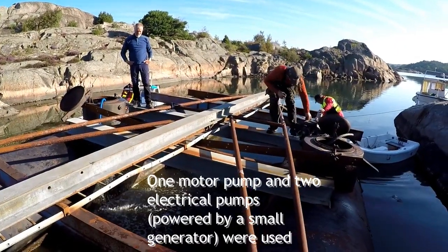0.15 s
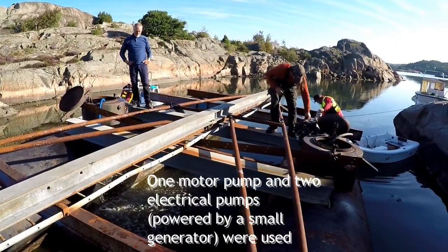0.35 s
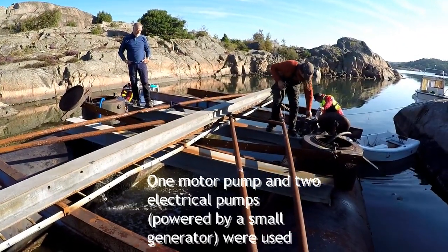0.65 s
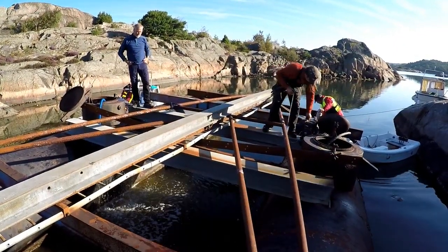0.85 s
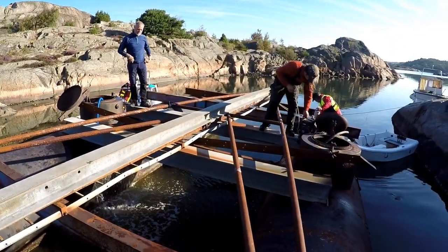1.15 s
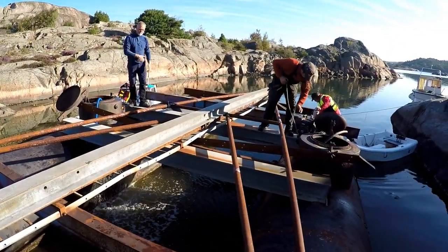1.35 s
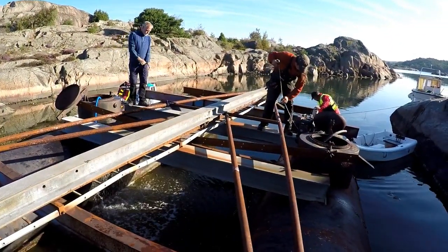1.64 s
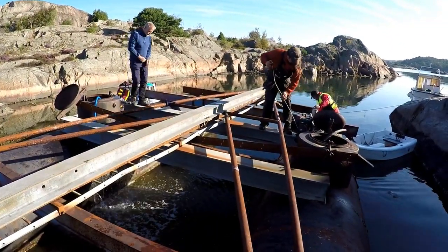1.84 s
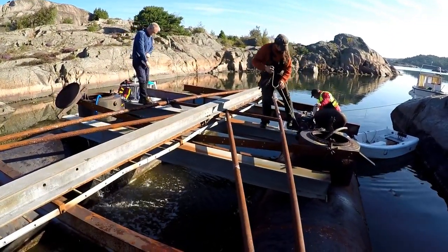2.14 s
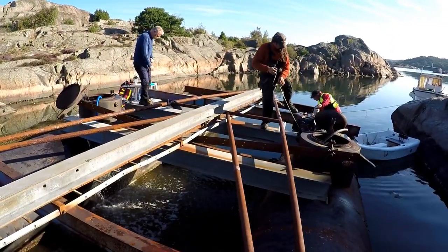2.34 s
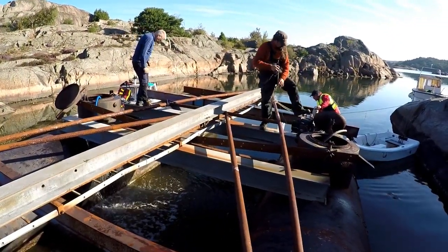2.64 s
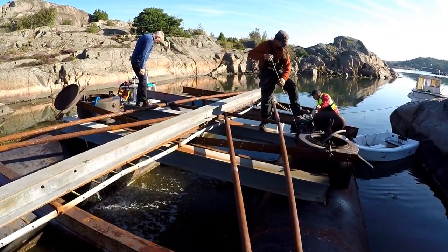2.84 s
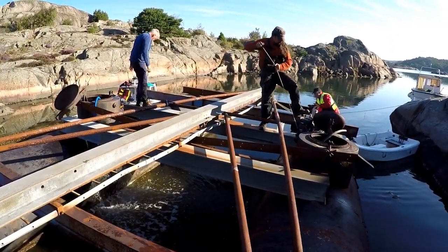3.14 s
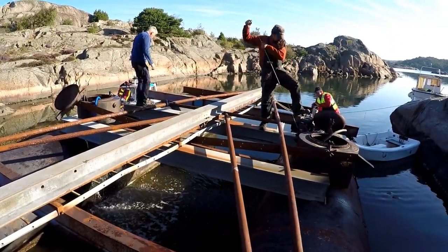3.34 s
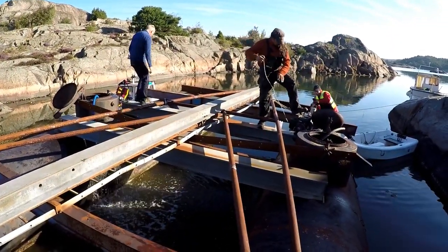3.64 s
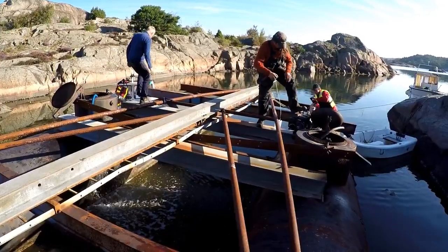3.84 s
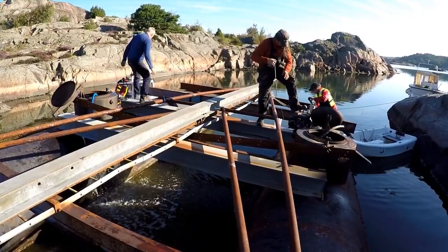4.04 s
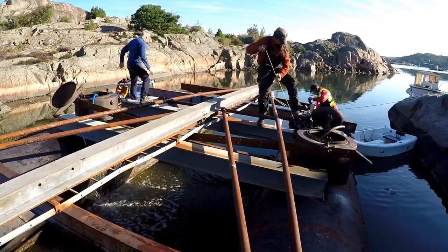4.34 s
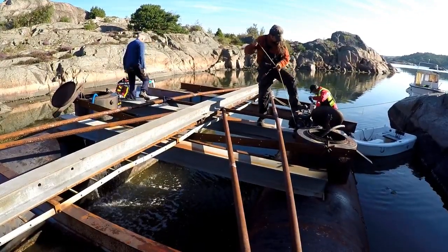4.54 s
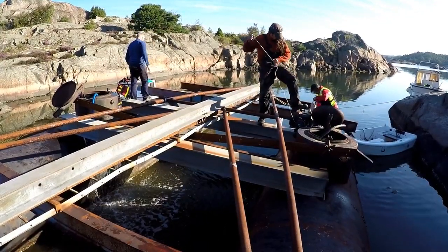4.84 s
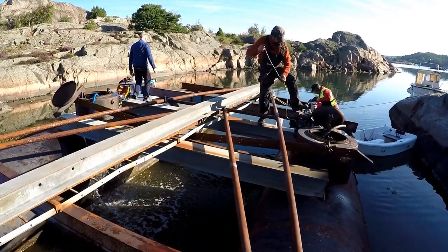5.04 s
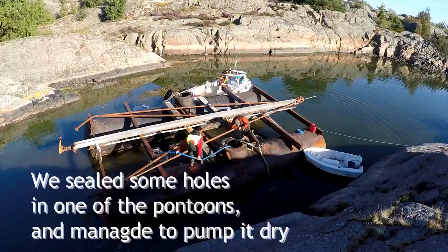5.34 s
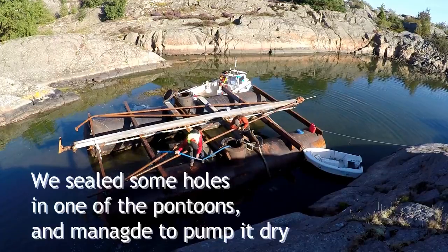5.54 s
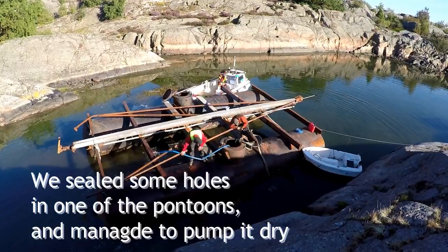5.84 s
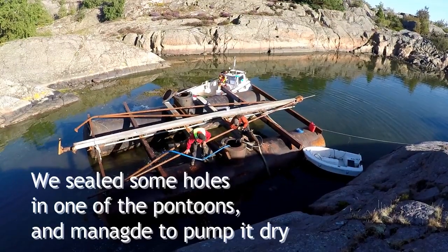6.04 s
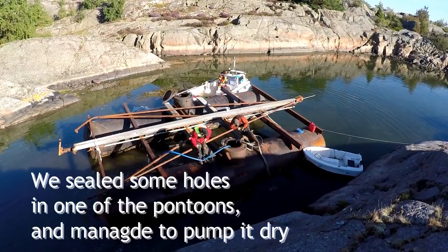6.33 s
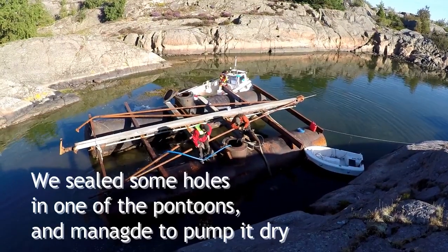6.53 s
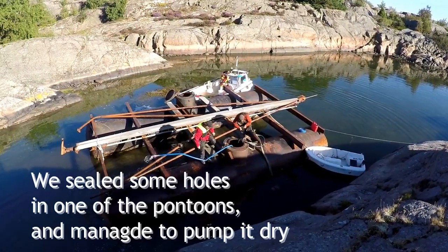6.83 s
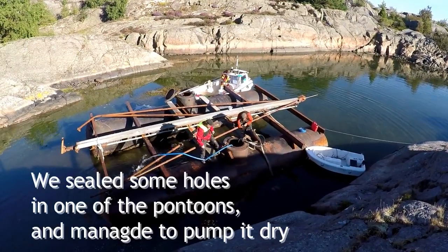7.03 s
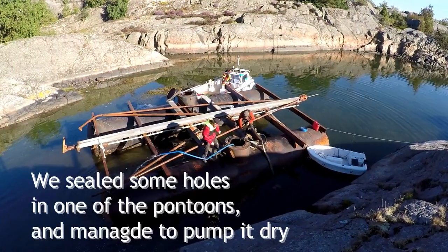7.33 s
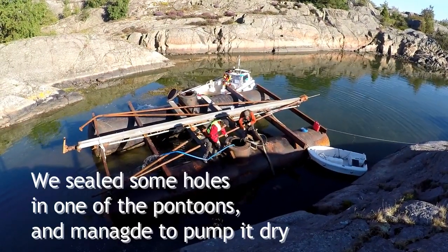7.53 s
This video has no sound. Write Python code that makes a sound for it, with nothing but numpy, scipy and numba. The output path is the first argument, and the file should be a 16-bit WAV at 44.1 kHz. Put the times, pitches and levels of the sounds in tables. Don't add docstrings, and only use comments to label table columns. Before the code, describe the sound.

From 0 to 5.27 s, a pumped water jet gushes near the microphone in an open rocky cove: steady bright hiss that flickers and swells slightly, crowded with bubbles, sharp plops and little splashes several times a second. Beneath it lies a faint, steady low engine drone around 70 Hz, gentle wind rumble and thin electronic hiss. At 5.27 s everything drops silent for about 0.04 s, returning with a small click. The water is now fainter and duller, briefly swelling near 5.75 s, while strong low gusts buffet the microphone. Shoes scuff and tick on gritty stone from 5.55 to 6.6 s, with a soft heel thud at 6.03. A short dry housing knock lands at 6.45, a longer, hollower one at 7.03. From 7.18 s something hollow scrapes; another heel thuds at 7.45. A metal ring clinks brightly, loudest at 7.42, then bounces at 7.56, 7.60 and 7.65 as it ends.

```python
import sys
import numpy as np
from scipy import signal
from scipy.fft import rfft, irfft, next_fast_len
from scipy.io import wavfile
from scipy.ndimage import uniform_filter1d
from numba import njit

SR = 44100
rng = np.random.default_rng(int(sys.argv[2]) if len(sys.argv) > 2 else 0)


def invert_db(x):
    u = np.asarray(x, float) / 20
    return 10 ** u


def master_out(mix):
    frames = np.transpose(np.atleast_2d(mix))
    ceiling = np.clip(frames, -1, 1)
    pcm = np.round(ceiling * 32767).astype(np.int16)
    wavfile.write(sys.argv[1], SR, pcm)


N = 338681
T = np.arange(N) / SR
CUT_S = (5.2705, 5.3138)
BY_WATER = T < CUT_S[1]


def unit(x):
    return x / np.sqrt(np.mean(x ** 2))


def colour(x, spectrum, bumps, lo_hz, hi_hz):
    size = next_fast_len(N)
    f = np.arange(size // 2 + 1) * SR / size + 1e-3
    hz, db = np.transpose(spectrum)
    db = np.interp(np.log(f), np.log(hz), db)
    db = db + sum(boost / (1 + (2 * (f - centre) / width) ** 2) for centre, width, boost in bumps)
    shaped = rfft(x, size) * invert_db(db)
    in_band = irfft(shaped * (f > lo_hz) * (f < hi_hz), size)[:N]
    return irfft(shaped, size)[:N] / np.std(in_band)


def walk(rate):
    k = int(SR / rate)
    held = np.repeat(rng.standard_normal(N // k + 1), k)
    return unit(uniform_filter1d(uniform_filter1d(held, k), k)[:N])


@njit
def grains(start, hz, cycles, size, glide):
    out = np.zeros(N)
    for k in range(len(start)):
        tau, phase = cycles[k] / hz[k] * SR, 0.
        for i in range(min(int(6 * tau), N - start[k])):
            phase += 2 * np.pi * hz[k] * (1 + glide * i / tau) / SR
            out[start[k] + i] += size[k] * np.sin(phase) * np.exp(-i / tau)
    return out


def typed(events, cycles, glide, db):
    s, peak_db, hz = np.array(events, float).T[:3]
    return grains((s * SR).astype(np.int64), hz, np.full(len(s), cycles), invert_db(peak_db + db), glide)


def crack(s, db, fade_s, lo_hz, hi_hz):
    snap = signal.lfilter(*signal.butter(1, [lo_hz, hi_hz], "band", fs=SR), rng.standard_normal(N))
    return invert_db(db) * snap * (T > s) * np.exp(-np.maximum(T - s, 0) / fade_s)


def strike(s, db, modes, damp_s, push_s):
    t = np.maximum(T - s, 0)
    ring = sum(invert_db(g - 60 * t / t60) * np.sin(2 * np.pi * hz * t) for hz, g, t60 in modes)
    push = np.sin(np.pi / 2 * np.minimum(t / push_s, 1)) ** 2
    choke = np.exp(-np.maximum(t - damp_s, 0) / 0.0018)
    return invert_db(db) * ring * push * choke


def spray(count, scatter_db, flicker_db, bubble_db):
    burst = invert_db(flicker_db * (0.31 * walk(19) + 0.56 * walk(35) + 0.5 * walk(90)))
    when, pitch, size, ring = rng.random((count, 4)).T
    start = (when * N).astype(np.int64)
    hz = 400 * 30. ** pitch
    size_db = np.minimum(-scatter_db * np.log(1 - size), 6)
    level = hz * invert_db(size_db) * np.minimum(burst[start], 1.15)
    bubbles = grains(start, hz, 2 + 6 * ring ** 2, level, 0.028)
    return unit(rng.standard_normal(N) * burst) + invert_db(bubble_db) * unit(bubbles)


# start in seconds, peak in dB, pitch in Hz, surge in dB.
PLOPS = [(0.018, -39, 1950, -72), (0.1226, -47, 5320, -61), (0.37, -50, 3460, -80), (0.536, -33, 5490, -69),
         (0.85, -37, 5360, -78), (0.9367, -36, 4100, -68), (1.4215, -43, 5120, -59),
         (1.484, -40, 4040, -68), (1.5497, -40, 2240, -64), (1.7814, -43, 2230, -60),
         (2.066, -39, 3850, -67), (2.118, -35, 4300, -82), (2.3, -40, 5420, -57), (2.4397, -34, 5200, -69),
         (2.535, -39, 3990, -72), (2.593, -33, 5860, -63), (2.8993, -32, 5400, -64),
         (2.9617, -39, 2270, -67), (3.164, -36.5, 3930, -70), (3.398, -35, 3540, -55),
         (3.5363, -34, 3560, -65), (3.626, -34, 3160, -59), (3.8324, -39, 4020, -61),
         (3.9235, -33, 5260, -76), (4.09, -39, 4020, -61), (4.5994, -40, 3470, -61),
         (4.838, -36, 3980, -53), (5.023, -41, 4020, -61), (5.1537, -39, 2290, -72),
         (5.2071, -40, 3610, -64)]
# start in seconds, peak in dB, pitch in Hz, surge in dB.
MORE_PLOPS = [(0.2289, -41, 3460, -64), (1.8194, -49, 3500, -64), (2.4384, -40, 5260, -66),
              (2.6694, -46, 2330, -65), (2.7332, -41, 2260, -74), (2.9392, -42, 3940, -70),
              (3.016, -50, 3890, -72), (3.1343, -39, 4070, -70), (3.4644, -42, 2250, -75),
              (3.5922, -41, 5360, -64), (3.7459, -42, 5200, -66), (3.8696, -47, 2890, -68),
              (4.2592, -40, 5370, -71), (4.6798, -41, 5500, -66), (4.7316, -42, 4270, -64),
              (4.811, -38, 5330, -61), (4.8494, -41, 3940, -64), (4.9172, -40, 2950, -80),
              (5.2294, -40, 5450, -64)]


def slaps(rise_s, fade_s):
    def bump(s, up, down):
        return np.exp(-np.abs(T - s) / np.where(T < s, up, down))

    out = 0
    for s, peak_db, _, surge_db in PLOPS + MORE_PLOPS:
        sheet = invert_db(peak_db - 33) * bump(s, rise_s, fade_s)
        out = out + sheet + invert_db(surge_db) * bump(s, 0.0021, 0.0073)
    return out


# time of the top in seconds, peak in dB.
MISTS = [(0.0598, -50.5), (0.1246, -53), (0.2194, -53.5), (0.4658, -51.5), (0.6943, -50), (0.7552, -49.5),
         (0.8515, -50.5), (0.9547, -49), (1.1538, -52.5), (1.2645, -50), (1.3957, -56), (1.479, -52),
         (1.5529, -49.5), (1.6696, -52.5), (1.7749, -47.5), (1.9061, -52), (2.1091, -52.5), (2.1705, -53),
         (2.2722, -56), (2.4379, -52), (2.5925, -49.5), (2.6648, -52), (2.7496, -48.5), (2.8544, -49.5),
         (2.9527, -50.5), (3.014, -52), (3.1772, -50.5), (3.2555, -52), (3.4516, -55.5), (3.5354, -50),
         (3.6237, -51.5), (3.699, -51.5), (3.7858, -48.5), (3.8487, -47.5), (3.9255, -48), (4.124, -47.5),
         (4.2842, -50), (4.3595, -49.5), (4.4867, -50.5), (4.6014, -51.5), (4.6683, -51), (4.7711, -49),
         (4.8374, -51.5), (5.1267, -54.5), (5.228, -51.5)]


def patchy(x, split_hz, body_db, mist_db, rate):
    body = signal.sosfiltfilt(signal.butter(2, split_hz, fs=SR, output="sos"), x)
    usual_db = np.mean(np.array(MISTS)[:, 1])
    cloud_db = 0
    for s, db in MISTS:
        spread_s = np.where(T < s, 0.0085, 0.019)
        cloud_db = cloud_db + max(2 + db - usual_db, 0) * np.exp(-((T - s) / spread_s) ** 2)
    before_cut = T < CUT_S[0]
    cloud_db = cloud_db - np.mean(cloud_db[before_cut]) * before_cut
    body_gain = invert_db(body_db * walk(rate) + 0.27 * cloud_db)
    mist_gain = invert_db(mist_db * walk(rate) + cloud_db)
    return body * body_gain + (x - body) * mist_gain


# frequency in Hz, density in dB per Hz.
WATER_NEAR = [(150, -35), (250, -2), (426, -10.5), (1260, -10), (1450, -4), (1750, -5), (2980, -2),
              (3310, -5.5), (5350, -3), (5940, -10), (15300, -24)]
WATER_FAR = [(150, -45), (250, -7), (682, -2.5), (1200, -6), (1330, -10), (1410, -5), (2410, -3.5),
             (3080, -6), (4770, -7), (12000, -33), (15600, -57), (22000, -120)]
# centre in Hz, width in Hz, boost in dB.
HOUSING_NEAR = [(776, 410, 4.5), (1240, 117, 6), (1456, 161, -17), (1736, 280, 3), (2220, 77, 4.5),
                (2080, 140, -5), (3060, 270, 2), (3337, 155, -9.5), (3490, 210, 7), (3980, 115, 6.5),
                (4900, 270, -3), (5360, 270, 5), (6390, 300, 3.5), (7160, 360, 7.5), (11770, 1500, 6.5)]
HOUSING_FAR = [(2460, 115, 7.8), (2800, 88, 1.1), (3400, 230, 4.5), (5020, 450, 4.5)]
# time in seconds, level in dB.
JET_FLOW = [(0, -54.5), (1.0, -54.5), (1.62, -55), (1.76, -54), (2.5, -54), (3.1, -55), (3.4, -52.5),
            (3.75, -55.5), (4.5, -54.5), (5.26, -54), (5.32, -61.5), (5.636, -62), (5.762, -56.5),
            (6.16, -62), (6.404, -59.5), (7.15, -62)]
# start in seconds, peak in dB, pitch in Hz.
GLUGS = [(1.1, -46, 2000), (2.328, -47, 1190), (2.6, -47, 1730), (2.7, -49, 2300), (2.409, -48, 1050),
         (3.315, -51, 680), (3.401, -46, 780), (3.536, -39, 2500), (2.8, -41, 3300), (2.4, -44, 3600),
         (4.9, -44, 3480), (3.1, -38, 2270), (3.7, -54, 1250), (5.2, -54, 960), (7.6, -52, 1250),
         (3.3, -53, 1200)]
# start in seconds, peak in dB, pitch in Hz.
PINGS = [
    (2.593, -51.5, 1240),
    (4.232, -49, 2270),
    (5.155, -52, 2290),
]


def water():
    near = spray(count=9000, scatter_db=2.5, flicker_db=1.0, bubble_db=-7.5)
    near = colour(near, WATER_NEAR, HOUSING_NEAR, 1500, 7540)
    far = spray(count=6000, scatter_db=2.0, flicker_db=2.0, bubble_db=-15.0)
    far = colour(far, WATER_FAR, HOUSING_FAR, 1460, 9000)
    churn_db = 0.24 * walk(22)
    flow = invert_db(np.interp(T, *np.transpose(JET_FLOW)) + churn_db) + slaps(0.00084, 0.0043)
    jet = patchy(np.where(BY_WATER, near, far), split_hz=7200, body_db=0.27, mist_db=0.72, rate=11) * flow
    plops = typed(PLOPS + MORE_PLOPS, 8.0, 0.008, -7)
    glugs = typed(GLUGS, 5.0, 0.017, -1.9)
    pings = typed(PINGS, 10.0, 0.002, 2.6)
    return jet + plops + glugs + pings


# time of the top in seconds, level in dB, length in seconds.
GUSTS = [(0.096, -50, 0.093), (0.21, -44, 0.15), (0.477, -42, 0.18), (0.775, -44.5, 0.17),
         (1.047, -41, 0.072), (1.19, -49, 0.12), (1.416, -44, 0.09), (1.693, -46, 0.039),
         (1.986, -45.5, 0.12), (2.42, -42, 0.19), (3.125, -39, 0.1), (3.465, -46, 0.17),
         (3.655, -45, 0.049), (4.115, -40.5, 0.088), (4.302, -47, 0.26), (4.485, -42.5, 0.13),
         (4.94, -43.5, 0.31), (5.183, -43, 0.18), (5.366, -33, 0.058), (5.474, -33.5, 0.086),
         (5.684, -31, 0.2), (5.916, -35, 0.085), (6.118, -36.5, 0.094), (6.6, -39, 0.2), (7, -32, 0.06),
         (6.76, -44, 0.097), (6.874, -39, 0.034), (7.10, -33.5, 0.072), (7.36, -42, 0.053),
         (5.77, -37, 0.04), (7.245, -33.5, 0.098), (7.46, -35, 0.12), (7.635, -34.5, 0.049)]


def gusts():
    power = invert_db(2 * np.where(BY_WATER, -49, -41))
    for s, db, length in GUSTS:
        power = power + invert_db(2 * db) * np.exp(-(2 * (T - s) / length) ** 2)
    return np.sqrt(power) * invert_db(2 * walk(13))


# start in seconds, length in seconds,
# level in dB.
LIGHT_PUFFS = [(0.18, 0.058, -49.5), (0.497, 0.054, -53.5), (0.726, 0.036, -52), (1.442, 0.03, -54),
               (1.521, 0.034, -57), (1.617, 0.027, -45), (1.67, 0.053, -48), (2.04, 0.046, -51),
               (2.245, 0.042, -52), (2.331, 0.034, -49), (2.482, 0.048, -52), (2.668, 0.05, -53),
               (3.063, 0.032, -53), (3.153, 0.04, -52), (3.751, 0.032, -53), (3.955, 0.066, -52),
               (4.045, 0.03, -60), (4.15, 0.13, -50), (4.402, 0.03, -54), (4.681, 0.038, -53),
               (4.857, 0.03, -58), (5.084, 0.052, -54), (5.176, 0.04, -61)]
ROCK_PUFFS = [(5.328, 0.071, -38), (5.438, 0.18, -40.5), (5.607, 0.056, -39), (5.686, 0.039, -42),
              (5.761, 0.068, -41), (5.894, 0.072, -40), (6.05, 0.042, -40), (6.102, 0.036, -37),
              (6.176, 0.082, -45), (6.477, 0.046, -42), (6.627, 0.048, -39), (7.024, 0.038, -46),
              (7.14, 0.05, -42), (7.212, 0.044, -48), (7.307, 0.063, -43.5), (7.52, 0.048, -41)]


def puffs():
    power = invert_db(2 * np.where(BY_WATER, -58, -49))
    for s, length, db in LIGHT_PUFFS + ROCK_PUFFS:
        power = power + invert_db(2 * (db - 0.5)) * np.exp(-(2 * (T - s - length / 2) / (0.89 * length)) ** 2)
    return np.sqrt(power)


# frequency in Hz, density in dB per Hz.
WIND_COLOUR = [(4.7, -11), (8.0, 1), (30, 2), (54, -11.5), (80, -17), (96, -22), (119, -23), (145, -29.5),
               (174, -28), (400, -43), (520, -72), (880, -120)]
GALE_COLOUR = [(4.7, -24), (8.0, 1), (27, 4.5), (46, -0.5), (67, -10.5), (107, -23.5), (167, -27),
               (221, -32), (239, -42), (320, -40.5), (420, -71), (700, -120)]


def wind():
    eddies = rng.standard_normal(N)
    breeze = colour(eddies, WIND_COLOUR, [], 14, 90)
    gale = colour(eddies, GALE_COLOUR, [], 8.6, 90)
    air = np.where(BY_WATER, breeze, gale)
    deep, low = (signal.sosfiltfilt(signal.butter(2, hz, fs=SR, output="sos"), air) for hz in (55, 100))
    rumble = deep / np.sqrt(uniform_filter1d(deep ** 2, size=3500) + 0.11)
    swell = uniform_filter1d(uniform_filter1d((low - deep) ** 2, size=1500), size=1500)
    flutter = (low - deep) / np.sqrt(swell + 0.011)
    rustle = (air - low) * invert_db(np.where(BY_WATER, -46, -36.5)) * invert_db(1.4 * walk(8.7))
    return rumble * gusts() + flutter * puffs() + rustle


# multiple, level in dB rms.
EXHAUST = [(2, -59), (4, -78.5), (5, -67.5), (6, -73), (7, -77), (8, -84.5), (10, -85.5), (11, -84.5),
           (13, -90)]


def engine():
    firing_hz = 35.82 * (1 + 0.0007 * walk(1.606))
    turn = 2 * np.pi * np.cumsum(firing_hz) / SR
    drone = sum(invert_db(db + 1.3 * walk(6)) * np.sin(k * turn + 6 * rng.random()) for k, db in EXHAUST)
    return np.sqrt(2) * drone


# pitch in Hz, level in dB rms.
WHINES = [(1464, -84), (8631, -88), (14086, -91)]
# frequency in Hz, density in dB per Hz.
HISS_COLOUR = [(2000, -26), (6000, 1), (12000, -2.5), (15500, -4)]
# centre in Hz, width in Hz, boost in dB.
HISS_PEAKS = [(9560, 170, 11), (14280, 400, 10)]


def electronics():
    whine = np.sqrt(2) * sum(invert_db(db) * np.sin(2 * np.pi * hz * T) for hz, db in WHINES)
    hiss = colour(rng.standard_normal(N), HISS_COLOUR, HISS_PEAKS, 6800, 14400)
    return whine + invert_db(-72 + 1.2 * walk(7.3)) * hiss


# pitch in Hz, level in dB, 60 dB decay in seconds.
RESUME_MODES = [(1500, -1.5, 0.0018), (556, 0.5, 0.004), (302, -10, 0.01), (131, -3, 0.036)]


def resume_click():
    return strike(CUT_S[1] - 0.0002, -35.5, RESUME_MODES, damp_s=0.1, push_s=0.0001)


# start in seconds, length in seconds, level in dB, fade in dB, brightness in dB
SCUFFS = [(5.567, 0.041, -61, 2, -3), (5.65, 0.094, -55, 9, 2), (5.77, 0.044, -65.5, 3, 7),
          (5.817, .008, -56, 5, 2), (5.859, 0.027, -58, 10, -6), (6.164, 0.03, -64.5, 1, -2),
          (6.228, 0.065, -61.5, 1, -3), (6.295, .05, -60, 5, 3), (6.505, 0.031, -54.5, 7, -4),
          (6.544, 0.026, -49.5, 13, 0.5), (6.958, 0.028, -66, 1, 6), (7.184, 0.03, -55, 12, -2),
          (7.187, 0.13, -64.5, -1, -8.5), (7.32, 0.1, -67, 1.1, -5), (7.405, .01, -55, 3, -1),
          (7.416, 0.04, -47, 7, 4), (7.426, 0.048, -63.5, -5.5, -8), (7.478, 0.084, -59.5, 2, -4.5),
          (7.556, 0.034, -62, 8.5, 10), (7.568, 0.053, -58.5, -1, -3.5), (7.627, .06, -61, 2, -8)]
# start in seconds, peak in dB, pitch in Hz.
TICKS = [(5.666, -67, 821), (5.677, -39, 2580), (5.789, -37.5, 2600), (5.819, -37.5, 5000),
         (5.857, -38, 2780), (6.166, -43, 2480), (6.211, -43, 1930), (6.311, -41, 2640), (6.506, -43, 1034),
         (6.513, -49, 880), (6.605, -51, 900), (6.547, -44, 2100), (5.858, -44, 4300), (5.858, -48, 1910),
         (6.166, -45, 3180), (6.229, -47, 1790), (6.311, -45, 4900), (6.32, -48, 2100), (6.33, -43, 2600),
         (6.523, -49, 1100), (5.819, -44, 3120), (5.931, -52, 2200), (6.56, -46, 2150), (7.466, -44, 5100)]
# start in seconds, peak in dB, pitch in Hz.
PEBBLES = [
    (5.819, -53, 6600),
    (6.547, -48, 8300),
    (6.549, -50, 4900),
    (6.547, -53, 4300),
    (6.635, -57, 2450),
    (5.665, -49, 4900),
]
# frequency in Hz, density in dB per Hz.
RUB_COLOUR = [(180, -51), (300, -8), (416, -17), (550, -4.5), (841, -10.5), (943, -9), (1670, -11.5),
              (2440, -5.5), (2690, -4.5), (5180, -5.5), (6100, -11.5), (15000, -30.5)]
# centre in Hz, width in Hz, boost in dB.
RUB_PEAKS = [(2570, 900, 5), (3200, 530, -10.5), (4400, 1100, 3.5)]


def scuffs():
    uneven = invert_db(0.84 * walk(160) + 0.92 * walk(45))
    rub = colour(rng.standard_normal(N) * uneven, RUB_COLOUR, RUB_PEAKS, 1500, 9000)
    dull = signal.lfilter(*signal.butter(1, 3200, fs=SR), rub)
    out = typed(TICKS, 11.0, 0.0045, -6.0) + typed(PEBBLES, 20.0, 0.001, 0.1)
    for s, db, hz in TICKS:
        out = out + crack(s, db - 3, 0.0027, 0.98 * hz, 1.22 * hz)
    for s, length, db, fade_db, tilt_db in SCUFFS:
        t = T - s
        shape = np.clip(t / 0.0044, 0, 1) * np.clip(1 + (length - t) / 0.013, 0, 1)
        shape = shape * invert_db(-fade_db * np.clip(t / length, 0, 2))
        out = out + invert_db(db) * shape * (dull * invert_db(-tilt_db) + (rub - dull) * invert_db(tilt_db))
    return out


# start in seconds, peak in dB.
THUDS = [
    (6.035, -48),
    (7.449, -44),
]
# pitch in Hz, level in dB, 60 dB decay in seconds.
THUD_MODES = [(175, 3, 0.084), (234, -8, 0.055)]


def thuds():
    return sum(strike(s, db, THUD_MODES, damp_s=0.2, push_s=0.0048) for s, db in THUDS)


# pitch in Hz, level in dB, 60 dB decay in seconds.
PANEL_MODES = [(626, -8.5, 0.021), (1130, -14, 0.018), (2710, -18, 0.0095)]


def knock(s, db, way, first_hz, tail_db):
    t = np.maximum(T - s, 0)
    body_hz, spread_s = 169, 0.0016
    turns = body_hz * t + (first_hz - body_hz) * spread_s * (1 - np.exp(-t / spread_s))
    decay = np.exp(-t / 0.00097) + invert_db(tail_db) * np.exp(-(t / 0.018) ** 2)
    shell = invert_db(db) * np.minimum(t / 0.00065, 1) ** 2 * decay * np.sin(2 * np.pi * turns)
    panels = strike(s + 0.00039, db, PANEL_MODES, damp_s=0.1, push_s=0.00039)
    return way * (shell - panels) + crack(s, db - 24, 0.0011, 2300, 4400)


# start in seconds, peak in dB, direction, first pitch in Hz, tail in dB.
KNOCKS = [
    (6.4506, -26.5, 0.96, 1340, -13),
    (7.0273, -29, -0.76, 1335, -4.5),
]


def knocks():
    return sum(knock(*row) for row in KNOCKS)


# start in seconds, length in seconds, level in dB, fade in dB.
DRAGS = [
    (7.182, .118, -57, 1),
    (7.427, .04, -61, 5),
    (7.563, 0.047, -63, 5),
]
# centre in Hz, width in Hz, boost in dB.
DRAG_PEAKS = [(2004, 110, 19), (2450, 160, 13), (2820, 120, 1), (3300, 490, -15), (3900, 200, 10),
              (4300, 300, 8), (4650, 130, 8), (5200, 250, 1), (6500, 300, 6)]


def drags():
    uneven = invert_db(1.6 * walk(70))
    scrape = colour(rng.standard_normal(N) * uneven, RUB_COLOUR, DRAG_PEAKS, 1500, 9000)
    level = 0
    for s, length, db, fade_db in DRAGS:
        t = T - s
        edges = np.clip(t / 0.002, 0, 1) * np.clip(1 + (length - t) / 0.006, 0, 1)
        level = level + invert_db(db - fade_db * np.clip(t / length, 0, 1)) * edges
    return scrape * level


# pitch in Hz, level in dB, 60 dB decay in seconds.
RING_MODES = [(4676, -2.5, 0.18), (4640, -12, 0.03), (4420, -9, 0.077)]
# pitch in Hz, level in dB, 60 dB decay in seconds.
RING_TOP = [(5770, -2.5, 0.014), (6700, -3, 0.012), (5150, -9, .015), (8000, -19, 0.034),
            (7450, -18, 0.033), (11100, -21, .03), (11800, -22, .015)]


def clink(s, db, damp_s, hard_db):
    main = strike(s, db, RING_MODES, damp_s, 0.0015)
    top = strike(s, db + hard_db, RING_TOP, damp_s, 0.0011)
    return main + top + crack(s, db + hard_db - 15, 0.004, 5200, 8400)


# start in seconds, peak in dB, damped after seconds, hardness in dB.
CLINKS = [
    (7.187, -51.5, .03, 6),
    (7.410, -42, 0.0087, -10),
    (7.4179, -30, 0.051, 0),
    (7.556, -37, 0.046, 3),
    (7.601, -40.5, 0.022, -8),
    (7.645, -38.5, .05, -6),
]


def clinks():
    return sum(clink(*row) for row in CLINKS)


def scene():
    heard = water() + wind() + engine() + electronics()
    heard = heard + scuffs() + thuds() + knocks() + drags() + clinks()
    before = heard * (T < CUT_S[0])
    after = heard * np.clip((T - CUT_S[1]) / 0.0017, 0, 1)
    return (before + after + resume_click())[None]


def band_limit(x):
    return signal.sosfilt(signal.butter(12, 15580, fs=SR, output="sos"), x)


def record(dry):
    mix = signal.sosfilt(signal.ellip(10, 0.2, 60, 15300, fs=SR, output="sos"), dry)
    return band_limit(mix)


dry = scene()
out = record(dry)
master_out(out)
```